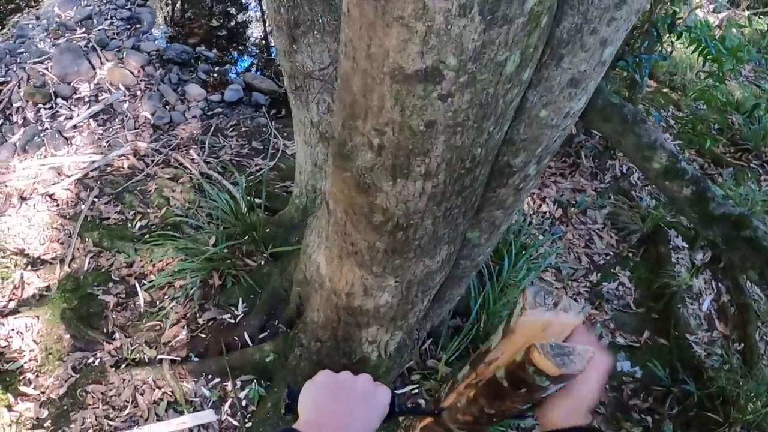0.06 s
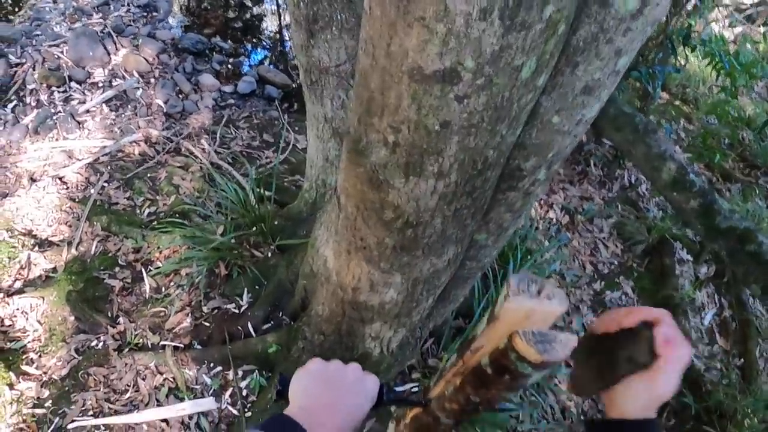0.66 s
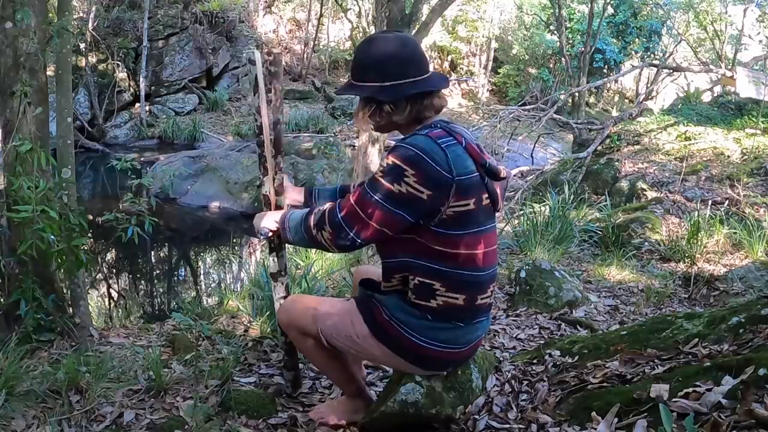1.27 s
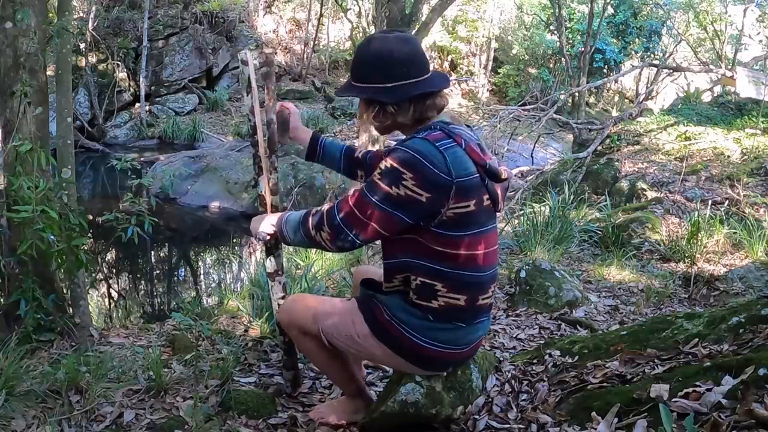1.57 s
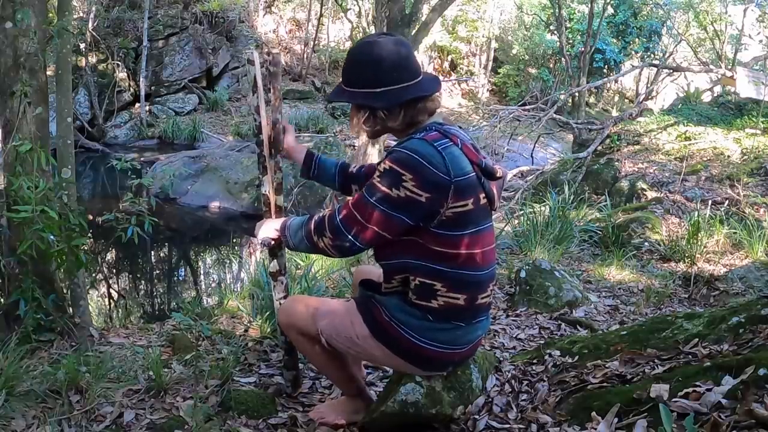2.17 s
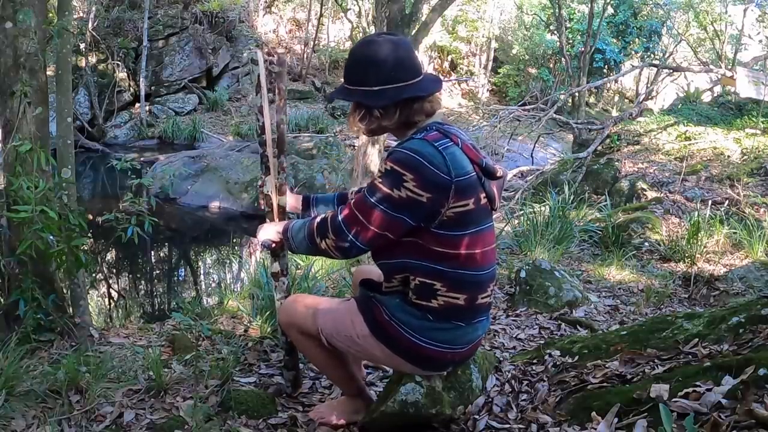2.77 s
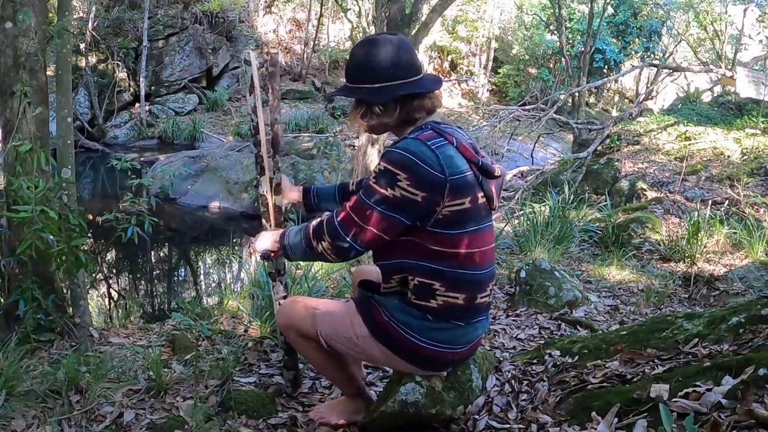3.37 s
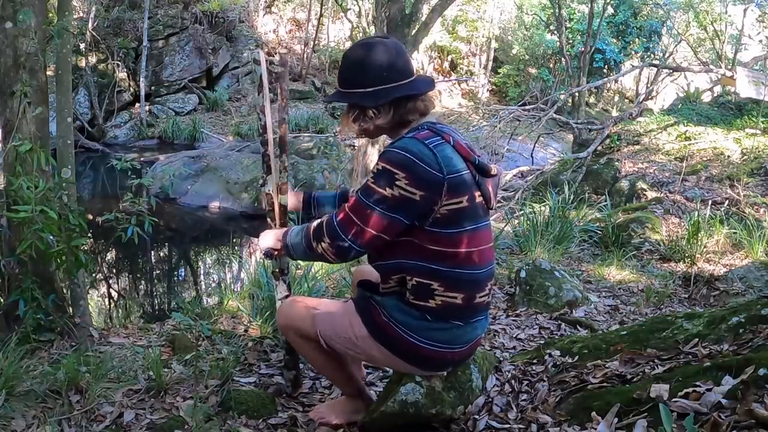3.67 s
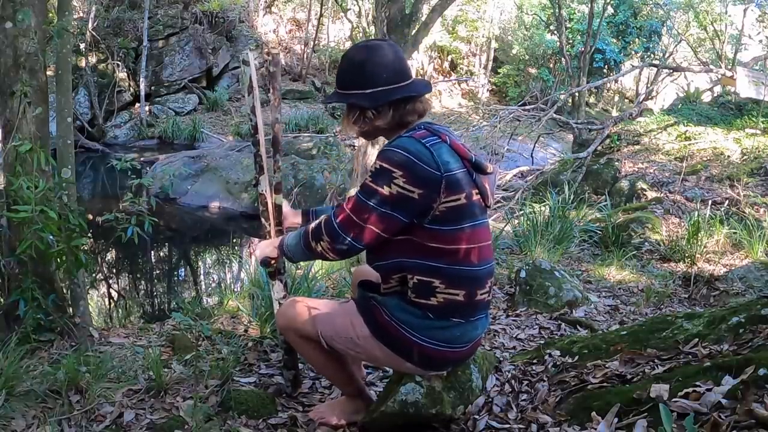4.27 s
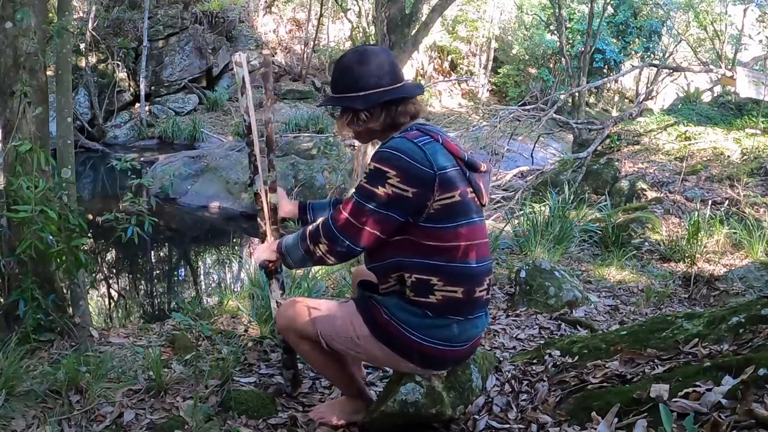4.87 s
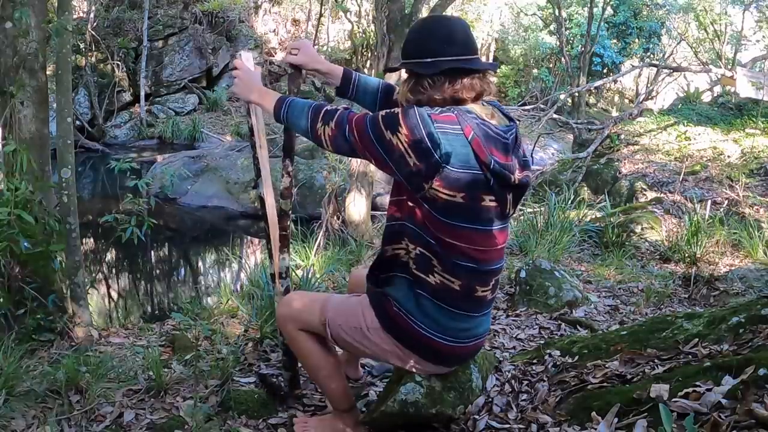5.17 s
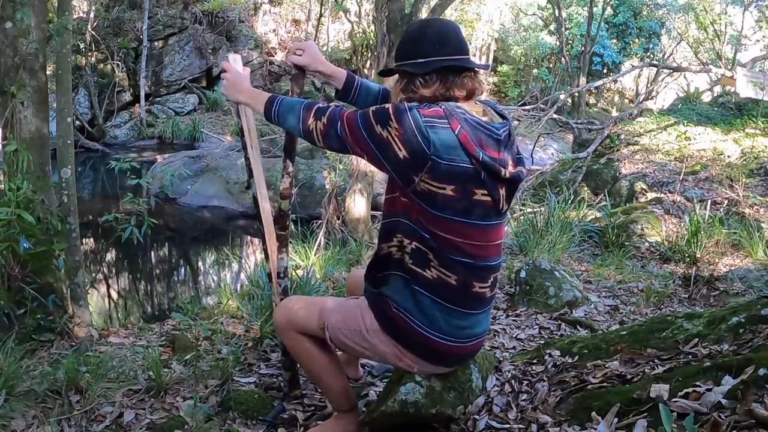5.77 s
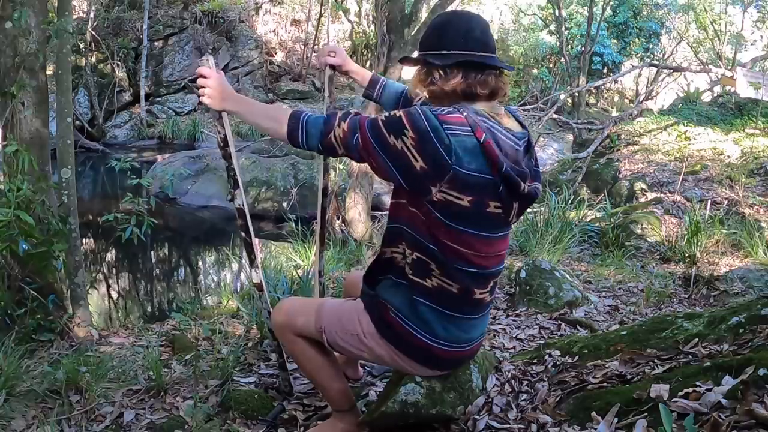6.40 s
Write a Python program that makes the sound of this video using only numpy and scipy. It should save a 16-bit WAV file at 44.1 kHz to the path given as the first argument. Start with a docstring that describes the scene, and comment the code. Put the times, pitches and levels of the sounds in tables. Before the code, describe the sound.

Sharp cracks of wood splitting under a struck blade in a quiet forest, followed by a dull thud, rustling leaves and a snap.

```python
"""Among trees, with a quiet creek some way off, a rock drives a knife down through a green sapling.
The stereo microphone is close at first. Each blow cracks the wood, rings the two halves and pushes
the stick's foot into the soil; the trees scatter it back. From 1.25 s we listen from a few steps away.
At 5.3 s the rock drops on the leaf litter; then the halves are pulled apart by hand and snap at 6.1 s."""
import sys
import numpy as np
from scipy import signal
from scipy.fft import rfft, irfft
from scipy.io import wavfile
from scipy.ndimage import uniform_filter1d

SR = 44100
rng = np.random.default_rng(int(sys.argv[2]) if len(sys.argv) > 2 else 0)


def unload_wav(signal):
    """Save mono or channel-first audio to the path in sys.argv[1] as 16-bit WAV at rate SR, clipped to [-1, 1]."""
    wavfile.write(
        sys.argv[1],
        SR,
        np.round(np.clip(np.atleast_2d(signal).T, -1, 1) * 32767).astype(np.int16),
    )


N = 284004
TIME = np.arange(N) / SR
AGE = np.arange(SR // 2) / SR   # seconds into one short sound

# Two microphone positions: beside the stick, then a few steps back. All t60 values are in seconds.
STEP_BACK_S = 1.25
CLOSE = dict(ring_t60=0.067, body_db=4.5, top_hz=11500, near_db=-16, far_db=-6.5, echo_dip_db=-10,
             mode_echo_db=2.5, snap_echo_db=-20, thud_t60=0.098, deep_db=-7)
AFAR = dict(ring_t60=0.096, body_db=-3.0, top_hz=18000, near_db=1, far_db=0, echo_dip_db=-0.36,
            mode_echo_db=-8, snap_echo_db=3.5, thud_t60=0.2, deep_db=1)
def mic_position(s):
    """Where the microphone stands at time s."""
    return CLOSE if s < STEP_BACK_S else AFAR


def from_db(db):
    """Decibels to gain."""
    return 10 ** (np.asarray(db) / 20)


def rms_one(x):
    """Scales a sound to rms 1."""
    return x / np.sqrt(np.mean(x ** 2) + 1e-20)


def at_hz(points, hz):
    """Reads a two-column table along log frequency."""
    points = np.array(points)
    return np.interp(np.log(hz), np.log(points[:, 0]), points[:, 1])


def bins(size):
    """Frequencies of a spectrum of this many samples, floored at 1 Hz."""
    return np.maximum(np.arange(size // 2 + 1) * SR / size, 1)


def dying(t60, hold=0):
    """Stays at 1 for the hold time, then falls 60 dB per t60."""
    return np.exp(-np.log(1000) * np.maximum(AGE - hold, 0) / t60)


def cut(x, hz, kind, order=2):
    """Butterworth low-, high- or band-pass."""
    return signal.sosfilt(signal.butter(order, hz, kind, fs=SR, output="sos"), x + 1e-18)


def add(track, s, sound):
    """Mixes a sound in from time s."""
    start = int(s * SR)
    sound, start = sound[..., max(-start, 0):], max(start, 0)
    track[:, start:start + sound.shape[-1]] += sound[..., :N - start]


def burst(noise, shape):
    """Noise under an envelope, scaled to the envelope's energy."""
    out = noise * shape
    return out * np.sqrt(np.mean(shape ** 2) / np.mean(out ** 2))


# The creek's spectrum from some way off: frequency_hz, level_db
CREEK_SPECTRUM = [(30, -6), (90, -14.5), (180, 6), (300, -7), (650, -11), (900, -9.5), (1300, 2.5),
                  (2500, 1), (5000, -8.5), (8000, -16.5), (11000, -34), (16000, -45)]
def creek(level_db=-59, shared=0.98, sheltered_db=-4.0):
    """Water over stones: an even wash with a low murmur, quieter while the microphone is behind a tree."""
    water = rng.standard_normal((2, N)) + shared * rng.standard_normal(N)
    wash = rms_one(irfft(rfft(water) * from_db(at_hz(CREEK_SPECTRUM, bins(N))), N))
    return from_db(level_db + sheltered_db * (TIME < STEP_BACK_S)) * wash


# What the trees send back to the microphone: band_hz, level_db, far_t60_s
FOREST_BANDS = [(155, -22, 0.27), (610, -19.5, 0.28), (1470, -9.5, 0.69), (2550, -8.5, 0.64),
                (4520, -9.5, 0.72), (7180, -10, 0.5), (14800, -18, 0.12)]
def forest_echo(sound, near_db, far_db, near_t60=0.28, bank_s=0.067, bank_rise_s=0.014, shared=0.61):
    """Near trunks answer a mono sound at once, the far bank later and longer; the top dies first."""
    age, log_hz = np.arange(SR) / SR, np.log(bins(SR))
    scatter = rfft(rng.standard_normal((2, SR)) + shared * rng.standard_normal(SR)) / np.hypot(1, shared)
    near = (1 - np.exp(-(age / 0.0033) ** 2)) * np.exp(-np.log(1000) * age / near_t60)
    near = from_db(near_db - 2) * near / np.linalg.norm(near)
    arrival = 1 + np.tanh((age - bank_s) / bank_rise_s / 2)
    echo, centres = 0, np.log([row[0] for row in FOREST_BANDS])
    for share, (_, db, t60) in zip(np.eye(len(FOREST_BANDS)), FOREST_BANDS):
        far = arrival * np.exp(-np.log(1000) * age / t60)
        far = from_db(far_db - 4) * far / np.linalg.norm(far)
        band = irfft(scatter * np.interp(log_hz, centres, share), SR)
        echo = echo + from_db(db) * band * np.hypot(near, far)
    echo = echo * from_db([[1.5], [-1.5]])   # leans left
    return signal.fftconvolve(sound[None], echo, axes=1)[:, :N]


# Spectrum of the leaf litter: frequency_hz, level_db
LEAF_SPECTRUM = [(180, -31), (300, -13.5), (425, -23), (470, -22.5), (749, -21), (930, -13), (1750, -20),
                 (3290, -10), (8640, -22.5), (16000, -39)]
# Leaves stirring and fibres straining, a few steps away: start_s, end_s, level_db
RUSTLES = [(5.13, 5.173, -59), (5.264, 5.683, -52), (5.309, 5.407, -43.5), (5.431, 5.477, -39.5),
           (5.777, 5.92, -50.5), (6.163, 6.266, -59)]
def rustle(grains_per_s=1500, hiss=0.83, rise_db_per_s=324, fall_db_per_s=196):
    """Dry leaves and stretched fibres crackle in tiny grains; each movement swells, holds and fades."""
    sizes = from_db(2.5 * np.minimum(rng.exponential(1, N), 4)) * rng.choice([-1, 1], N)
    grains = sizes * (rng.random(N) < grains_per_s / SR)
    grains = rms_one(grains * (1 + 0.13 * rng.standard_normal((2, N))))   # slight stereo spread
    crackle = grains + hiss * rng.standard_normal((2, N))
    crackle = irfft(rfft(crackle) * from_db(at_hz(LEAF_SPECTRUM, bins(N))), N)
    levels = [db - rise_db_per_s * np.maximum(start - TIME, 0) - fall_db_per_s * np.maximum(TIME - end, 0)
              for start, end, db in RUSTLES]
    return rms_one(crackle) * from_db(np.max(levels, axis=0))


# Movements that shake the microphone: start_s, level_db
MIC_JOLTS = [(5.108, -33), (5.195, -40), (5.281, -39), (5.555, -51), (5.8, -46.5), (6.129, -34),
             (6.262, -34.5), (6.41, -44)]
def mic_rumble(band_hz=(22, 66), t60=0.26, blow_db=-36.5):
    """Each jolt rumbles in the microphone; close to the stick, the blows shake it too."""
    out = np.zeros((2, N))
    close_blows = [(s + THUD_DELAY_S, blow_db) for s, *_ in CRACKS if 0 < s < STEP_BACK_S]
    for s, db in close_blows + list(MIC_JOLTS):
        shared, opposed = cut(rng.standard_normal((2, len(AGE))), band_hz, "band")
        shake = burst(shared * [[.5], [1]] + 0.37 * opposed * [[1], [-1]], dying(t60))
        add(out, s, from_db(db) * cut(shake, 2 * band_hz[1], "low"))
    return out


def thud(hz, t60, deep_db, swell_s=0.0047, width=1.55, deep_hz=90):
    """A muffled knock with a deeper push under it, as on soft soil."""
    shape = (1 - np.exp(-AGE / swell_s)) * dying(t60)
    knock = burst(cut(rng.standard_normal(len(AGE)), [hz / width, hz * width], "band"), shape)
    deep = burst(cut(rng.standard_normal(len(AGE)), [deep_hz / width, deep_hz * width], "band"), shape)
    return cut(knock + from_db(deep_db) * deep, 2 * hz, "low")


# Dull knocks, a few steps away: start_s, level_db, pitch_hz, t60_s, deep_db
DULL_KNOCKS = [(2.312, -45, 456, 0.34, -17), (5.168, -34.5, 230, 0.046, 7.5), (5.234, -28.5, 267, 0.047, 0),
               (5.799, -41.5, 259, 0.083, -9), (6.116, -27.5, 706, 0.075, -20),
               (6.339, -38, 166, 0.062, -11)]
def dull_knocks():
    """Dull knocks and scuffs, and the low body of the wood as it snaps."""
    out = np.zeros((2, N))
    for s, db, hz, t60, deep_db in DULL_KNOCKS:
        add(out, s, from_db(db) * thud(hz, t60, deep_db))
    return out


LEAF_LEAD_S = 0.0056   # the rock meets the leaves just before the soil
# The rock lands, a few steps away: start_s, level_db, pitch_hz, t60_s, crushed_leaves_db
ROCK_BOUNCES = [(5.3214, -17.5, 170, 0.052, -26), (5.3923, -10, 213, .034, -30.5),
                (5.413, -18.5, 220, 0.038, -35.5)]
def dropped_rock(knock_hz=480, knock_db=-19.0, clod_hz=510, clod_db=-18.5):
    """At each bounce the rock knocks the loose earth, then pushes a low note out of the soft soil."""
    out = np.zeros((2, N))
    for s, db, hz, t60, _ in ROCK_BOUNCES:
        push = np.sin(2 * np.pi * hz * AGE) + from_db(knock_db) * np.sin(2 * np.pi * knock_hz * AGE)
        add(out, s, from_db(db) * cut(push * dying(t60), [70, 800], "band"))
        add(out, s - LEAF_LEAD_S, from_db(db + clod_db) * thud(clod_hz, t60=0.054, deep_db=-11.0))
    return out


# Light touches on the knife: start_s, peak_db, pitch_hz
BLADE_PINGS = [(0.0607, -36, 3630), (5.719, -30, 4270), (5.733, -40, 4100)]
def blade(t60=0.019):
    """Held in the hand, the steel blade gives only a short ping."""
    out = np.zeros((2, N))
    for s, db, hz in BLADE_PINGS:
        add(out, s, from_db(db) * np.sin(2 * np.pi * hz * AGE) * dying(t60))
    return out


# How alike the two microphone ports hear the direct sound: frequency_hz, likeness_0_to_1
MIC_LIKENESS = [(200, 0.78), (1500, 0.93), (3000, 0.74), (6000, 0.84), (12000, 0)]
# Balance of the stick between the ports: frequency_hz, left_minus_right_db
MIC_BALANCE = [(700, -2), (1400, -0.5), (2400, 3.5), (4500, 4.5), (6200, 2), (8500, -6), (13000, -15.5)]
def wood_noise(spectrum, tilt_db, body_db=0, pan_db=0, modes=(), body_hz=1036, body_octaves=0.54):
    """Wood's countless close modes as stereo noise; tilt_db is per octave, body_db its hollow note."""
    hz = bins(len(AGE))
    hollow_db = body_db * np.exp(-(np.log2(hz / body_hz) / body_octaves) ** 2 / 2)
    colour = from_db(at_hz(spectrum, hz) + hollow_db + tilt_db * np.log2(np.maximum(hz, 700) / 2500))
    # weak modes crowd round the strong ones
    crowding = sum(from_db(db) / (1 + (np.log2(hz / centre) / 0.062) ** 2) for centre, db in modes)
    colour = colour * (1 + 1.73 * crowding)
    mid, side = np.exp(2j * np.pi * rng.random((2, len(hz))))
    alike, sides = at_hz(MIC_LIKENESS, hz), np.array([[1], [-1]])
    stereo = np.sqrt(1 + alike) * mid + np.sqrt(1 - alike) * side * sides
    treble_pan_db = pan_db / (1 + (1900 / hz) ** 4)
    lean = from_db(sides * (at_hz(MIC_BALANCE, hz) + treble_pan_db) / 2)
    return rms_one(irfft(colour * lean * stereo, len(AGE)))


# Spectrum of a breaking fibre: frequency_hz, level_db
FIBRE_SPECTRUM = [(200, 2.5), (700, -11), (1300, 4.5), (2800, 5.5), (5000, -1), (7000, -8.5),
                  (10000, -14.5), (16000, -41)]
def snap(t60, tilt_db, body_db=0, rise_s=0.00024, after_db=-12.5, after_t60=0.089):
    """A fibre gives way with a short bright tick that lingers faintly; thin fibres radiate no bass."""
    decay = np.hypot(dying(t60, hold=0.00053), from_db(after_db) * dying(after_t60))
    shape = (1 - np.exp(-AGE / rise_s)) * decay
    return cut(burst(wood_noise(FIBRE_SPECTRUM, tilt_db, body_db), shape), 1000, "high")


# Fibres snapping, touches of rock and blade: start_s, level_db, tilt_db_per_octave, hollow_body_db
FIBRE_SNAPS = [ (.061, -41.5, 4, -11), (.199, -47, 3, 16), (0.234, -31.5, -4.5, 12), (.42, -46.5, 7, -3),
               (.515, -49.5, 6, -7), (.2564, -19, -6.5, -5), (.630, -30, -11.5, -6), (1.011, -37.5, 5, 21),
               (1.022, -32, -3.5, 13), (1.069, -32.5, -9.5, -3), (1.9212, -26.5, 5, -9),
               (2.324, -40, -0.5, 4), (2.933, -31, -4, -2), (3.866, -28.5, -1.5, -18),
               (4.3666, -27, -3, 0.5), (4.873, -29.5, -9, -7), (5.207, -40.5, 1.5, -7),
               (5.236, -24.5, 4, 14), (5.3493, -29.5, 5, 0), (5.462, -30.5, 1, -3), (5.599, -37, 3.5, -12),
               (5.718, -36, 7, 1), (5.799, -12.5, 10.5, 19), (5.8701, -20, 6, 7), (5.908, -16.5, 2.5, -4),
               (5.9529, -29.5, 3.5, -4), (6.092, -35.5, 5.5, 8), (6.103, -15, 5.5, 3)]
def snaps(neutral_t60=0.02, crush_t60=0.063, crush_tilt_db=3):
    """Fibres snap, the brighter the shorter; dry leaves are crushed under the falling rock."""
    direct, sent = np.zeros((2, 2, N))
    sounds = [(s, tilt_db, from_db(db) * snap(neutral_t60 * 2 ** (-tilt_db / 10), tilt_db, body_db))
              for s, db, tilt_db, body_db in FIBRE_SNAPS]
    sounds += [(s - LEAF_LEAD_S, crush_tilt_db, from_db(leaves_db) * snap(crush_t60, crush_tilt_db))
               for s, *_, leaves_db in ROCK_BOUNCES]
    for s, tilt_db, sound in sounds:
        add(direct, s, sound)
        beaming_db = 0.82 * max(tilt_db, 0)   # bright snaps are thrown one way only, so they echo less
        add(sent, s, from_db(mic_position(s)["snap_echo_db"] - beaming_db) * sound)
    return direct, forest_echo(sent.mean(axis=0), near_db=-3.5, far_db=-5.5)


def splinters(t60=0.11, per_s=260, grain_s=0.00007):
    """Envelope of the last fibres letting go one by one behind the blade."""
    sizes = from_db(-np.minimum(rng.exponential(1, len(AGE)), 3))
    breaks = sizes * (rng.random(len(AGE)) < per_s / SR)
    return signal.lfilter([1], [1, -np.exp(-1 / (grain_s * SR))], breaks + 1e-9) * dying(t60)


def all_round(sound):
    """What the stick radiates in all directions: a 10 ms pulse of the same colour, notches filled in."""
    power = uniform_filter1d(np.abs(rfft(sound)) ** 2, size=160)
    pulse = np.roll(irfft(np.sqrt(np.abs(power)), len(sound)), 200)
    return pulse * (AGE < .01)


def crack_echo(front, notes, tear_s, mic, round_db=0.75, front_db=-9.0, dip_hz=(1810, 3420)):
    """The trees return the crack, thrown forward and all round, and its notes, with a dip in the mids."""
    carry_db = -2.5 * np.log2(max(tear_s / 0.0039, 1))   # a quick, clean crack carries furthest
    sent = from_db(round_db) * all_round(front) + from_db(front_db) * front
    sent = from_db(carry_db) * (sent + from_db(mic["mode_echo_db"]) * notes)
    sent = sent + (from_db(mic["echo_dip_db"]) - 1) * cut(sent, dip_hz, "band", order=1)
    return forest_echo(sent, mic["near_db"], mic["far_db"])


# Spectra of the tearing wood and of the ringing halves: frequency_hz, level_db
CRACK_SPECTRUM = [(200, -25), (600, -16), (900, -29.5), (1250, 3.5), (2000, -2), (2900, 1), (3700, -2.5),
                  (5200, -0.5), (6400, -10), (7500, -10), (9500, -15), (11000, -25.5), (15500, -43.5)]
RING_SPECTRUM = [(200, -16), (700, -23), (950, -12), (1250, -5.5), (1700, 0), (2900, -6.5), (3700, -7),
                 (5200, -13), (6500, -15.5), (9500, -22), (11500, -32), (15500, -50)]
# Modes of the stick that ring in every crack: pitch_hz, level_db
SHARED_MODES = [(2200, -9), (2830, -2.5)]
# The sapling splits, close by and then a few steps off: start_s, level_db, tear_s, tilt_db_per_octave,
# low_mode_hz, low_mode_db, second_mode_hz, second_mode_db, treble_left_minus_right_db, thud_db
CRACKS = [ (-.16, -12.5, 0.0047, -0.5, 1330, -13, 4640, -9, -11, -38),
          (0.2451, -15, 0.0047, -1.1, 1530, -8, 5530, -8, -7, -36.5),
          (0.642, -14, 0.0035, -1.9, 1670, -13, 5200, -8, -3.5, -35),
          (1.0307, -15, 0.0054, -1.5, 1590, 2, 2747, 1, -7, -41.5),
          (1.3892, -15.5, 0.0012, 0.5, 1533, 0.5, 2200, -1, 1, -34.5),
          (1.8845, -16, 0.0027, 1.55, 1554, 2.5, 2340, 1.5, 4, -37),
          (2.3871, -16, 0.0031, -0.15, 1548, 6.5, 3113, 1, 5, -38),
          (2.893, -18.5, 0.003, 0.7, 1422, -1, 4980, -12, -0.5, -36.5),
          (3.358, -21.5, 0.018, -1, 1480, -2.5, 2500, -7, -4, -33),
          (3.8187, -17, 0.0019, .5, 1420, 1, 4370, -4.5, 0, -39),
          (4.3376, -15.5, 0.0021, .5, 1246, -3.5, 2020, -15, 2.5, -34),
          (4.82, -16.5, 0.0011, 1, 1240, 0.5, 2046, -32, -8.5, -31.5),
          (6.1148, -15.5, 0.00057, 0.8, 1560, -3, 2850, 2.5, 1, -35),
          (6.1265, -24, 0.0046, 2.2, 1580, -24, 2656, 10.5, -3, -36.5)]
def sapling_cracks(rise_s=0.0011, crack_t60=0.018, mode_t60=0.032, ring_db=-2.0, splinter_db=-26.0):
    """Fibres tear for a few ms; the halves ring on, at pitches that shift as the split grows."""
    direct, echoes = np.zeros((2, 2, N))
    rise = 1 - np.exp(-AGE / rise_s)
    for s, db, tear_s, tilt_db, low_hz, low_db, second_hz, second_db, pan_db, _ in CRACKS:
        mic = mic_position(s)
        shared = [(hz * (1 + 0.016 * rng.standard_normal()), level) for hz, level in SHARED_MODES]
        modes = [(low_hz, low_db), *shared, (second_hz, second_db)]
        crack = wood_noise(CRACK_SPECTRUM, tilt_db, mic["body_db"], pan_db, modes)
        crack = burst(crack, rise * dying(crack_t60, tear_s))
        ring = wood_noise(RING_SPECTRUM, tilt_db, mic["body_db"], pan_db, modes)
        ring = from_db(ring_db) * burst(ring, rise * dying(mic["ring_t60"], tear_s))
        fibres = from_db(splinter_db) * wood_noise(FIBRE_SPECTRUM, tilt_db, pan_db=pan_db) * splinters()
        # stone on steel: one hard, bright click 1 ms into the crack
        click = burst(wood_noise(CRACK_SPECTRUM, tilt_db + 1.5, pan_db=pan_db), dying(0.0083, hold=0.0026))
        click = np.roll(click, int(0.001 * SR), axis=1)
        wood = cut(crack + ring + fibres + click, mic["top_hz"], "low")
        notes = sum(from_db(level) * np.sin(2 * np.pi * hz * AGE) for hz, level in modes)
        notes = notes * rise * dying(mode_t60)
        add(direct, s, from_db(db) * (wood + notes))
        add(echoes, s, from_db(db) * crack_echo(wood.mean(axis=0), notes, tear_s, mic))
    return direct, echoes


THUD_DELAY_S = 0.00624   # from the crack to the thud under it
def stick_foot(pitch_hz=158.3, deep_db_per_s=-4):
    """The stick's foot thuds into the soil, losing depth as the blade works down the stick."""
    out = np.zeros((2, N))
    for s, *_, thud_db in CRACKS:
        mic = mic_position(s)
        deep_db = mic["deep_db"] + deep_db_per_s * max(s - STEP_BACK_S, 0)
        add(out, s + THUD_DELAY_S, from_db(thud_db) * thud(pitch_hz, mic["thud_t60"], deep_db))
    return out


def scene():
    """Stick, ground and leaves in front of the microphone, trees all round, the creek behind."""
    wood, wood_echo = np.add(sapling_cracks(), snaps())
    wood[0] = np.roll(wood[0], 1)   # sound from the wood reaches the right port first
    thuds = stick_foot() + dull_knocks() + dropped_rock() + mic_rumble()
    thud_echo = forest_echo(thuds.mean(axis=0), near_db=-1.5, far_db=0.0)
    return wood + blade() + wood_echo + thuds + thud_echo + rustle() + creek()


def record(dry, cutoff_hz=15900):
    """The recorder rounds the peaks and cuts the top steeply."""
    return signal.sosfilt(signal.ellip(10, .1, 80, cutoff_hz, fs=SR, output="sos"), np.tanh(dry))


dry = scene()
out = record(dry)
unload_wav(out)
```